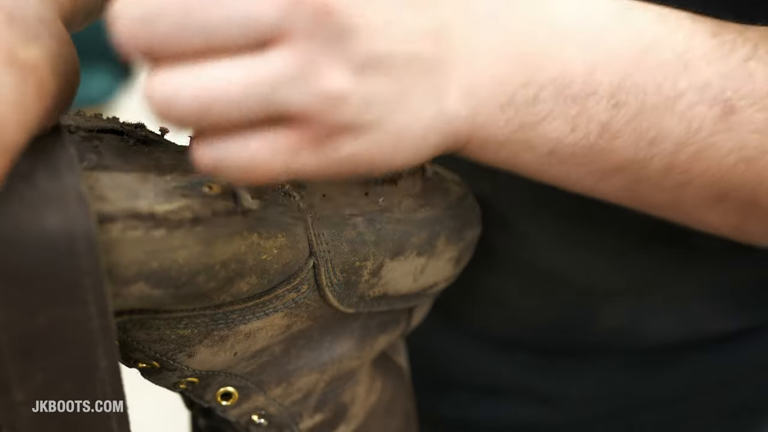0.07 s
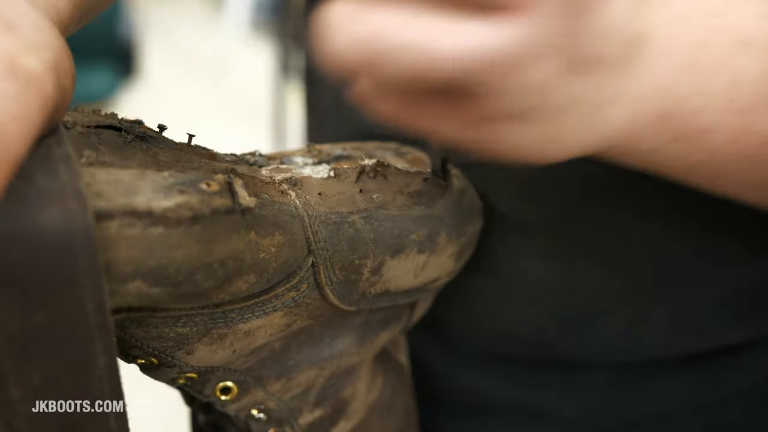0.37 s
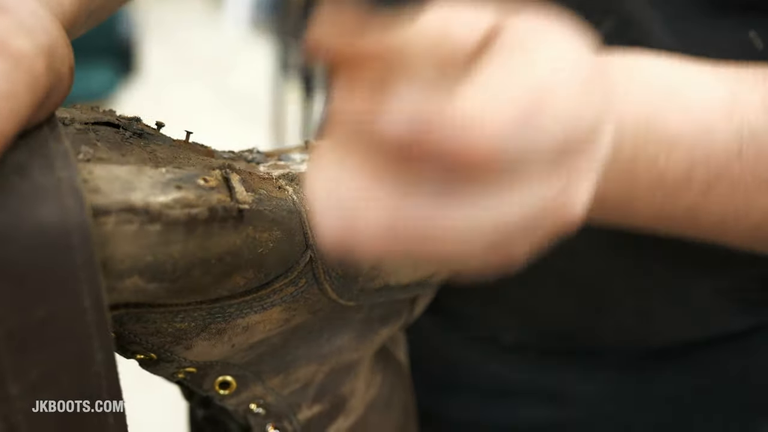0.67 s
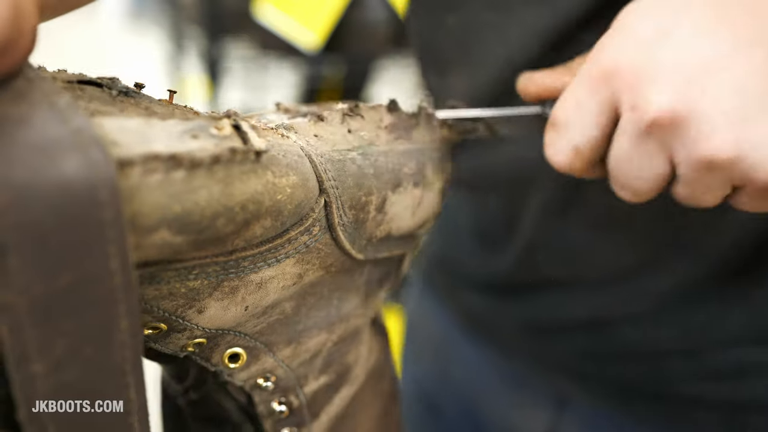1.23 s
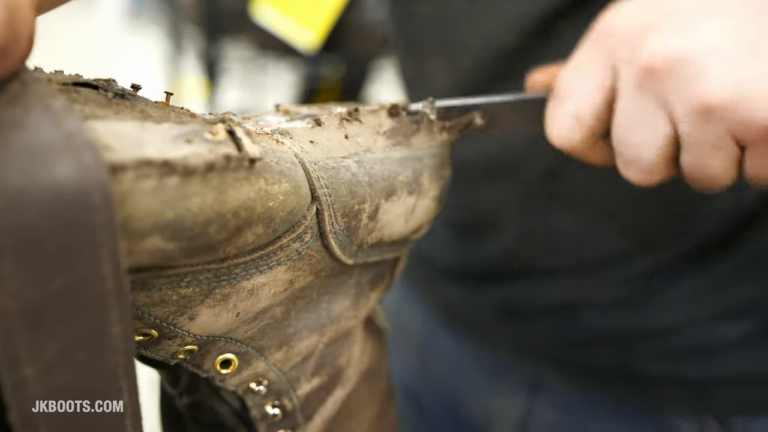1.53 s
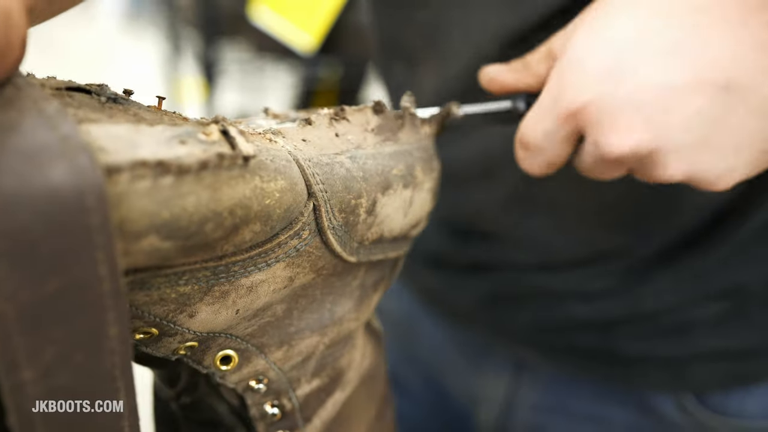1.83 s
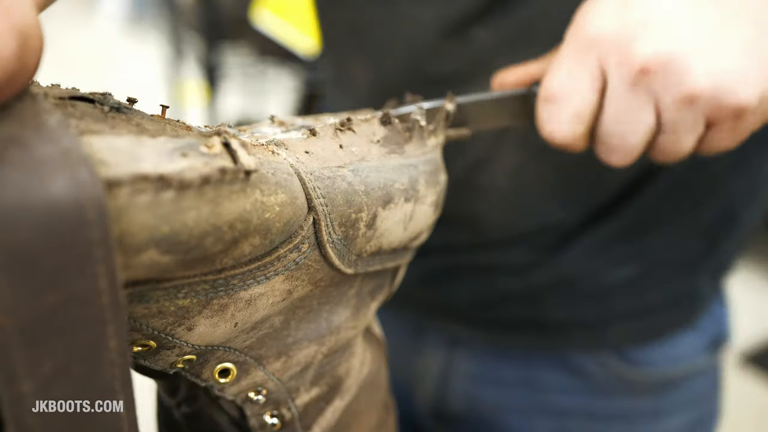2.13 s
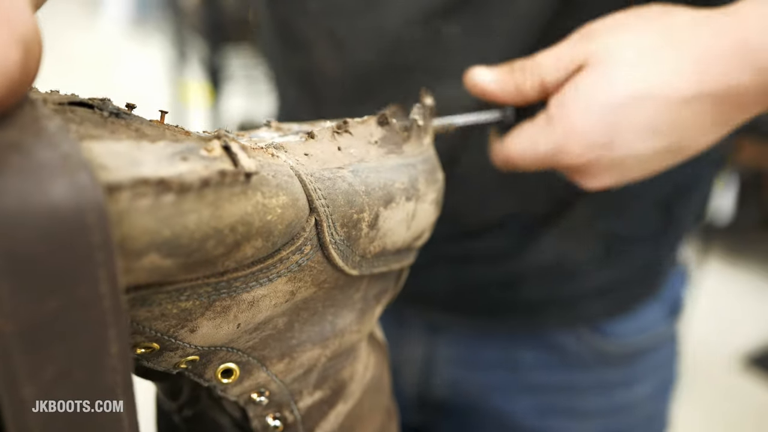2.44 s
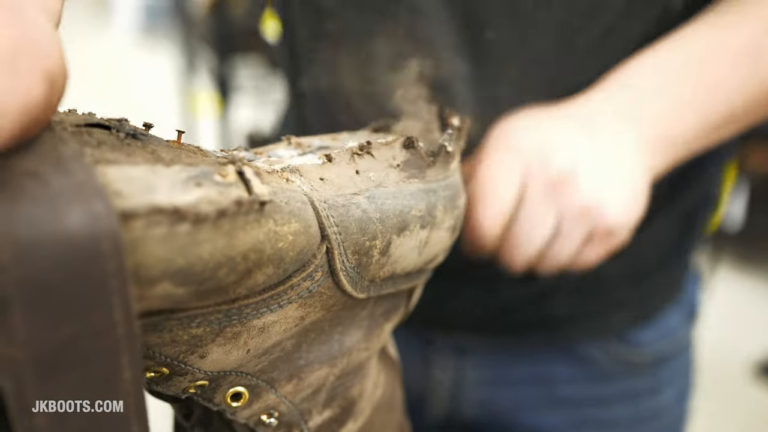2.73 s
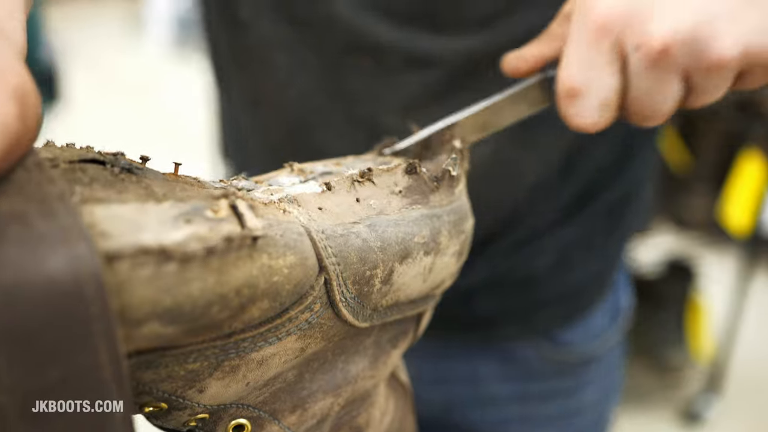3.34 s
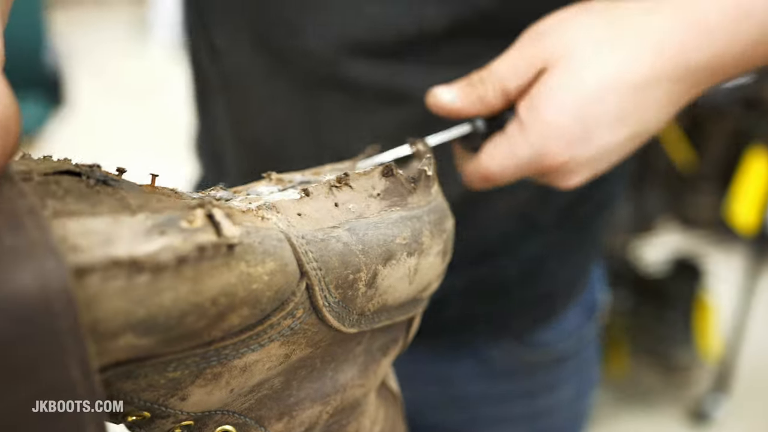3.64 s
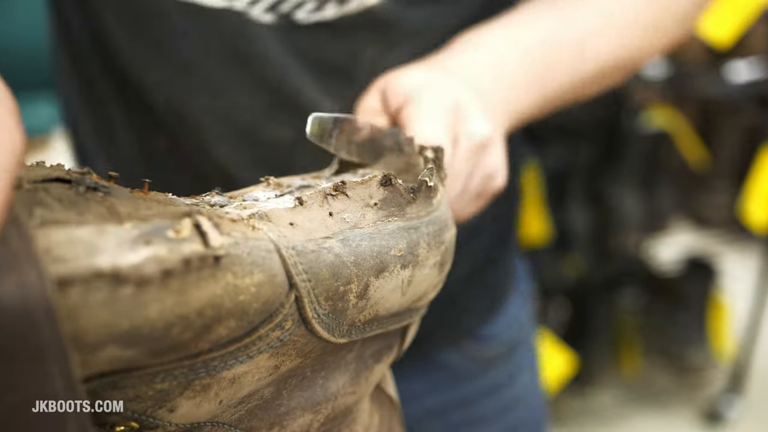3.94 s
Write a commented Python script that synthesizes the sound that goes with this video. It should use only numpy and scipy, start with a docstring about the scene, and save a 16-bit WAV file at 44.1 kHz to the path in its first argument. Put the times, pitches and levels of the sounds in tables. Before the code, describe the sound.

Hollow knocks and leather rips as a blade pries a boot sole, workshop machinery humming.

```python
"""Stripping a boot sole

A cobbler works the sole off a work boot with hand tools, close up. The tool knocks on nails and thuds
into the hollow boot. Leather rips and rasps, steel rubs over the insole, a hand shifts softly on the
boot, and fibres tick and crackle as a blade pries under the heel. Workshop machinery hums behind."""
import sys
import numpy as np
from scipy import signal
from scipy.fft import rfft, irfft
from scipy.io import wavfile

SR = 44100
rng = np.random.default_rng(int(sys.argv[2]) if len(sys.argv) > 2 else 0)


def wav_record(signal):
    """Record a signal, one row per channel, as 16-bit PCM in the file named by sys.argv[1]."""
    frames = np.transpose(np.atleast_2d(signal))
    bounded = np.clip(frames, -1, 1)
    # unit amplitude maps onto the largest positive 16-bit level
    quanta = np.round(bounded * 32767).astype(np.int16)
    wavfile.write(sys.argv[1], SR, quanta)


N = 176400
T = np.arange(N) / SR


def from_db(db):
    """Decibels to gain."""
    return 10 ** (np.asarray(db) / 20)


def unit_power(x):
    """Normalise to an rms of one."""
    return x / np.sqrt(np.mean(x ** 2) + 1e-20)


def eq(x, curve):
    """Filter through a curve of (frequency [Hz], gain [dB]) points."""
    hz, db = np.transpose(curve)
    bin_hz = np.arange(N // 2 + 1) * SR / N
    gain = from_db(np.interp(np.log(bin_hz + 1e-9), np.log(hz), db))
    return irfft(rfft(x) * gain, N)


def colour(x, curve):
    """EQ a sound and bring it to unit power."""
    return unit_power(eq(x, curve))


def band(x, hz, width):
    """Broad resonance from hz / width to hz * width, at unit power."""
    edges = [hz / width, min(hz * width, .45 * SR)]
    return unit_power(signal.sosfilt(signal.butter(2, edges, "band", fs=SR, output="sos"), x))


def low_cut(x, hz, order=2):
    """Roll off the bass."""
    return signal.sosfilt(signal.butter(order, hz, "high", fs=SR, output="sos"), x)


def envelope(start, rise, hold, fall):
    """Linear attack, hold, then 20 dB of decay per fall time; all in seconds."""
    attack = np.clip((T - start) / rise, 0, 1)
    return attack * from_db(-20 * np.clip((T - start - rise - hold) / fall, 0, 10))


def fader(ride):
    """Gain that follows (time [s], level [dB]) points."""
    return from_db(np.interp(T, *np.transpose(ride)))


def grains(per_s, spread_db):
    """Tiny slips: randomly timed clicks of uneven size."""
    sizes = from_db(spread_db * np.minimum(rng.exponential(1, N), 4))
    return sizes * rng.choice([-1, 1], N) * (rng.random(N) < per_s / SR)


def drift(points):
    """Smooth wander through evenly spaced random points."""
    return np.interp(T, np.linspace(0, T[-1], points), rng.standard_normal(points))


def ring(start, hz, t60):
    """A struck mode: a sine that dies by 60 dB in t60 seconds."""
    age = np.maximum(T - start, 0)
    return np.sin(2 * np.pi * hz * age) * np.exp(-np.minimum(np.log(1000) * age / t60, 40))


def tone(hz, waver_db):
    """A sine of about unit power that follows a pitch curve and wavers in level."""
    return np.sqrt(2) * from_db(waver_db * drift(points=40)) * np.sin(2 * np.pi * np.cumsum(hz) / SR)


def reflections(x, decay_s):
    """A dense cluster of early reflections, about as strong as the sound itself."""
    cluster = rng.standard_normal(N) * np.exp(-np.minimum(T / decay_s, 40))
    return signal.fftconvolve(x, cluster / np.linalg.norm(cluster))[:N]


# Bed of rumble and air: (frequency [Hz], gain [dB])
RUMBLE_EQ = [(20, -10), (60, -34.5), (95, -19.5), (120, -9.5), (168, 0.5), (200, -8), (280, -14),
             (450, -16.5), (720, -22), (830, -28), (1100, -28.5), (1600, -39.5), (2450, -34.5), (3100, -50),
             (4500, -51), (11000, -60.5), (16000, -69)]
# Motor hum: (pitch [Hz], rms level [dB])
MOTOR_TONES = [(586.1, -34.2), (318, -50), (349, -51)]
# A thin whine dips and swells: (time [s], rms level [dB])
WHINE_RIDE = [(0, -55.5), (.8, -55.5), (1.3, -61), (2.6, -62), (3.05, -59), (3.42, -51.5), (3.6, -54),
              (3.78, -53), (4, -53)]


def machinery(rumble_db=-31.5, whine_hz=2421):
    """Steady workshop rumble under wavering motor tones and a thin, unsteady whine."""
    out = from_db(rumble_db) * colour(rng.standard_normal(N), RUMBLE_EQ)
    for hz, db in MOTOR_TONES:
        out += from_db(db) * tone(hz + 0.4 * drift(points=24), waver_db=1.1)
    return out + fader(WHINE_RIDE) * tone(whine_hz + 4.4 * drift(points=120), waver_db=2.2)


# Fader rides for the rub's mids, treble and top sheen: (time [s], level [dB])
RUB_MID_RIDE = [(0, -51.5), (.8, -50), (1.15, -53), (1.5, -48), (1.8, -44), (1.92, -50.5), (2.2, -41.5),
                (2.45, -48.5), (2.85, -58.5), (3.1, -50), (3.4, -51.5), (3.7, -50), (4, -46)]
RUB_TREBLE_RIDE = [(0, -50.5), (.33, -50.5), (.62, -51.5), (.85, -49), (1.08, -54), (1.13, -62), (1.5, -54),
                   (1.83, -55), (1.91, -59.5), (2.1, -53.5), (2.22, -55), (2.35, -52.5), (2.52, -54.5),
                   (2.72, -55.5), (2.82, -58.5), (3.02, -68), (3.06, -63), (3.27, -58), (3.32, -54),
                   (3.46, -63.5), (3.56, -52.5), (3.76, -51.5), (3.85, -47.5), (4, -44.5)]
RUB_SHEEN_RIDE = [(0, -53), (.2, -59), (.4, -62), (.75, -79), (1.15, -65), (1.26, -58), (1.63, -55.5),
                  (1.7, -68), (1.74, -56), (2.12, -55), (2.22, -69), (2.29, -54.5), (2.37, -65),
                  (2.44, -56), (2.5, -62), (2.56, -52), (2.65, -73), (2.7, -50), (2.79, -55.5), (2.86, -76),
                  (2.94, -61), (3.02, -76), (3.06, -63), (3.16, -62), (3.36, -63), (3.55, -53.5),
                  (3.75, -60), (3.85, -47), (3.9, -58), (4, -51)]
# Tone of each rub layer: (frequency [Hz], gain [dB])
RUB_MID_EQ = [(400, -21), (800, -8), (1400, 3), (2200, 0.5), (3000, -7.5), (4500, -15.5), (8000, -36)]
RUB_TREBLE_EQ = [(1500, -17), (3000, -2), (4500, 4.5), (6500, 0.5), (10000, -6.5), (13000, -12),
                 (16000, -34)]
RUB_SHEEN_EQ = [(5000, -25), (8000, -5.5), (10500, 1.5), (12500, -2.5), (14500, -11), (16000, -22)]


def blade_rub():
    """Steel slides over the leather insole: three layers of fine-grained friction."""
    layers = [(RUB_TREBLE_RIDE, RUB_TREBLE_EQ), (RUB_SHEEN_RIDE, RUB_SHEEN_EQ),
              (RUB_MID_RIDE, RUB_MID_EQ)]
    return sum(fader(ride) * colour(grains(per_s=9000, spread_db=1.5), curve) for ride, curve in layers)


# Dark boot body and bright fibre hiss: (frequency [Hz], gain [dB])
BOOT_EQ = [(40, -30), (90, -18), (140, -6.5), (240, 1.5), (320, -1), (500, -4), (750, -10), (1300, -52),
           (4000, -68)]
HISS_EQ = [(800, -4), (2200, 6), (3200, -5.5), (4900, 1.5), (6300, -6.5), (10000, -10), (13000, -18),
           (16000, -38)]
# Leather rips, and soft grip rubs at 2.875 and 3.025 s: (start [s], attack [s], hold [s],
# 20 dB fall [s], body [dB], rasp [dB], rasp centre [Hz], rasp width [ratio], hiss [dB])
RIP_AND_GRIP_CUES = [(0.0, 0.001, 0.015, 0.2, -26, -30.5, 1100, 1.5, -42),
                     (0.417, .026, .05, .125, -19, -27, 900, 1.7, -36.5),
                     (0.426, .012, .008, .02, -30, -27, 1600, 1.4, -41),
                     (0.905, .03, .045, .11, -28.5, -30.5, 1100, 1.7, -36.5),
                     (1.072, .004, .027, 0.008, -23, -26.5, 1100, 1.8, -38),
                     (1.997, 0.0039, 0.0052, .02, -37, -30, 850, 1.4, -48),
                     (2.875, .025, .06, .1, -49, -42, 790, 1.25, -70),
                     (3.025, .02, .075, .12, -50, -40.5, 870, 1.25, -57),
                     (3.531, .004, 0.026, .11, -36, -26.5, 820, 1.55, -54),
                     (3.94, 0.023, .04, .1, -24, -31, 1320, 1.54, -40.5)]


def rips_and_grip_rubs():
    """Leather rips in dense slips, plus two faint, soft, low rubs as the hand shifts on the boot."""
    body_slips, hiss_slips, rasp_slips = (grains(per_s=4000, spread_db=3.5) for _ in range(3))
    body, hiss = colour(body_slips, BOOT_EQ), colour(hiss_slips, HISS_EQ)
    out = np.zeros(N)
    for start, rise, hold, fall, body_db, rasp_db, rasp_hz, rasp_width, hiss_db in RIP_AND_GRIP_CUES:
        rasp = band(rasp_slips, rasp_hz, rasp_width)
        texture = from_db(body_db) * body + from_db(rasp_db) * rasp + from_db(hiss_db) * hiss
        out += texture * envelope(start, rise, hold, fall)
    return out


# Hollow thuds: (time [s], base level [dB], pitch [Hz], push [s], t60 [s], overtone [ratio],
# overtone gain [dB])
THUD_CUES = [(0.224, -2, 236, 0.0041, 0.055, 2.27, -6), (0.4302, 3, 153, 0.0092, 0.06, 2.28, -18),
             (0.889, -17, 330, .001, .025, 2.03, -2), (1.063, -8.5, 268, 0.0028, 0.043, 1.6, -22),
             (1.0746, 5.5, 156.7, 0.011, 0.052, 3.135, -11.5), (3.873, -14, 297, 0.0009, 0.025, 2.05, -13)]


def boot_thuds():
    """A soft push swells the boot's low resonance and its overtone, which die away quickly."""
    out = np.zeros(N)
    for start, db, hz, push, t60, overtone, overtone_db in THUD_CUES:
        modes = ring(start, hz, t60) + from_db(overtone_db) * ring(start, hz * overtone, t60)
        makeup_db = 20 * push / t60  # offsets some of the decay during the push
        swell = np.clip((T - start) / push, 0, 1) * from_db(db + makeup_db)
        out -= low_cut(modes * swell, 0.92 * hz)
    return out


# Bright crack, shared with the fibre crackle, and crushed grit: (frequency [Hz], gain [dB])
CRACK_EQ = [(500, 5), (1100, 0.5), (2100, 9), (3100, 1), (4500, 3), (7000, -1), (10500, 3.5), (14000, -8),
            (16000, -9)]
GRIT_EQ = [(100, -27), (300, -8.5), (600, 6.5), (1200, -1.5), (2000, -5.5), (3200, -16), (5000, -19),
           (10000, -26), (16000, -53)]
# Tool and sole ringing together: (frequency [Hz], gain [dB], t60 [s])
KNOCK_MODES = [(485, -30, 0.011), (696, -16.5, 0.028), (1152, -6, 0.0076), (1550, -10.5, 0.0071),
               (1940, -6.5, 0.0045), (4420, -14.5, 0.0041), (9180, -28, 0.0046)]
# Knock cues: (time [s], ring gain [dB], pitch [ratio], contact low-pass [Hz], crack [dB], crunch [dB])
KNOCK_CUES = [(0.2254, 5, 0.904, 2200, -23, -29.5), (0.8842, -8.5, 0.95, 7000, -21.5, -31),
              (2.01, -15, 0.92, 3000, -26, -37), (2.7073, 5, 1.007, 4400, -22.5, -25.5),
              (3.8720, 4.5, 1.14, 8000, -17, -25)]


def tool_knocks(bite_s=0.0033, bite_db=-21, crack_rise_s=0.0025):
    """The tool hits the nailed sole: a small bite, a crack, a short hollow ring and a crunch of grit."""
    crack = colour(rng.standard_normal(N), CRACK_EQ)
    grit = colour(grains(per_s=4000, spread_db=3.5), GRIT_EQ)
    out = np.zeros(N)
    for start, db, pitch, contact_hz, crack_db, crunch_db in KNOCK_CUES:
        modes = sum(from_db(mode_db) * ring(start, hz * pitch, t60) for hz, mode_db, t60 in KNOCK_MODES)
        pole = np.exp(-2 * np.pi * contact_hz / SR)  # softer contact, duller ring
        softened = signal.lfilter([1 - pole], [1, -pole], modes)
        out -= from_db(db) * low_cut(softened, hz=324)
        out += from_db(db + bite_db) * grit * envelope(start - bite_s, bite_s / 2, hold=0, fall=bite_s)
        crack_shape = envelope(start - crack_rise_s / 2, crack_rise_s, hold=0, fall=0.0028)
        out += from_db(crack_db) * crack * crack_shape
        out += from_db(crunch_db) * grit * envelope(start - bite_s, bite_s, hold=0.019, fall=0.049)
    scoop = signal.iirnotch(859, Q=2.27, fs=SR)  # the sole swallows a band between its modes
    return signal.lfilter(*scoop, out)


# Snaps and ticks: (time [s], level [dB], centre [Hz])
SNAP_CUES = [(0.434, -29, 7500), (0.889, -30, 8500), (1.078, -26, 6940), (1.1805, -29, 9400),
             (1.212, -39, 11000), (1.2817, -36, 11000), (1.2987, -33.5, 8950), (1.317, -39, 9000),
             (1.342, -26.5, 2780), (1.451, -30, 7040), (1.949, -34, 7050), (1.969, -37, 8000),
             (2.035, -33, 8000), (2.402, -39, 7500), (2.4592, -32, 11000), (2.467, -32, 9000),
             (2.5567, -36, 9000), (2.601, -41, 11500), (2.635, -29, 10000)]


def snaps():
    """Single fibres snap and the blade ticks on nails: pinpoint bursts of bright noise."""
    noise = rng.standard_normal(N)
    return sum(from_db(db) * band(noise, hz, width=1.3) * envelope(start, 10 / SR, hold=0, fall=0.0026)
               for start, db, hz in SNAP_CUES)


# Steely ring of the blade: (frequency [Hz], gain [dB])
STEEL_MODES = [(1750, -11), (2700, -7), (4300, -14), (8900, -9), (10800, -2), (13300, 0)]
# Runs of crackle: (start [s], attack [s], hold [s], 20 dB fall [s], level [dB])
CRACKLE_CUES = [(1.315, 0.058, 0.04, 0.1, -37.5), (1.935, 0.016, 0.054, 0.07, -38.5),
                (2.549, 0.0072, 0.015, 0.16, -49.5)]


def fibre_crackle(blade_db=-7.5):
    """Fibres tear apart over the prying blade, and each slip sets the steel ringing."""
    slips = grains(per_s=870, spread_db=2.5)
    blade = sum(from_db(db) * ring(0, hz, t60=0.021) for hz, db in STEEL_MODES)
    ringing = unit_power(signal.fftconvolve(slips, blade)[:N])
    crackle = unit_power(colour(slips, CRACK_EQ) + from_db(blade_db) * ringing)
    runs = sum(from_db(db) * envelope(start, rise, hold, fall)
               for start, rise, hold, fall, db in CRACKLE_CUES)
    return crackle * runs


def friction(wet_db=-8.5):
    """Rips, crackle, snaps and rubs, coloured by close reflections off hands and boot."""
    direct = rips_and_grip_rubs() + fibre_crackle() + snaps() + blade_rub()
    wet = from_db(wet_db)
    return (direct + wet * reflections(direct, decay_s=0.0065)) / np.hypot(1, wet)


# Stereo width of the diffuse sound: (frequency [Hz], side gain [dB])
SIDE_EQ = [(25, -6), (60, -4), (125, -64), (250, -33), (500, -21.5), (1000, -10), (2000, -7.5),
           (8000, -11.5), (14000, -9.5)]


def scene(scatter_db=-7.5, pan_db=0.02):
    """Everything sits near the centre; a diffuse side layer adds a little width."""
    hits = tool_knocks() + boot_thuds()
    mid = machinery() + hits + friction()
    diffuse = machinery() + friction() + from_db(scatter_db) * reflections(hits, decay_s=0.018)
    side = eq(diffuse, SIDE_EQ)
    return np.array([(mid + side) * from_db(pan_db), (mid - side) * from_db(-pan_db)])


def record(dry, top_hz=15800):
    """The microphone sheds deep bass, the hardest peaks soft-clip and the top is cut steeply."""
    thin = low_cut(dry, hz=65, order=3)
    clipped = thin / (1 + thin ** 6) ** (1 / 6)
    return signal.sosfilt(signal.ellip(10, .1, 80, top_hz, fs=SR, output="sos"), clipped)


dry = scene()
out = record(dry)
wav_record(out)
```